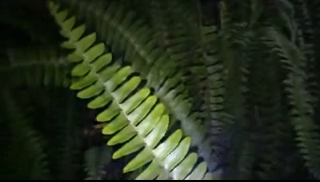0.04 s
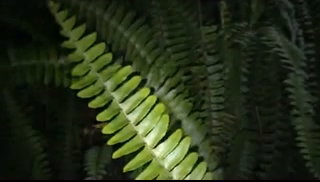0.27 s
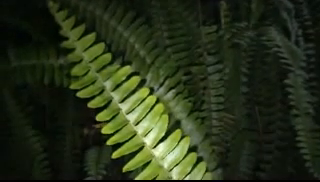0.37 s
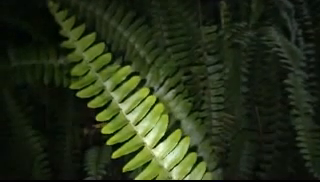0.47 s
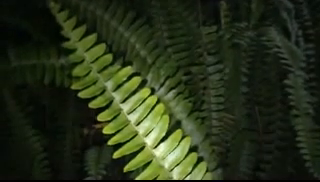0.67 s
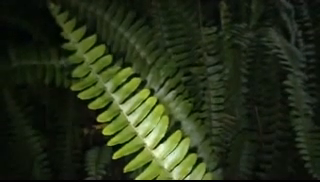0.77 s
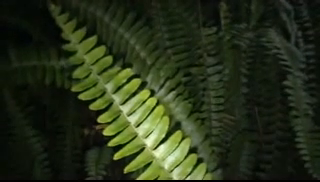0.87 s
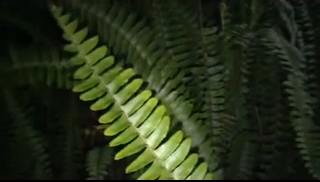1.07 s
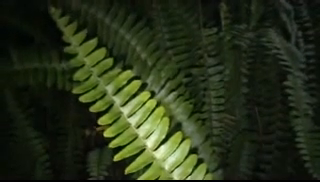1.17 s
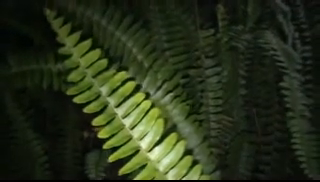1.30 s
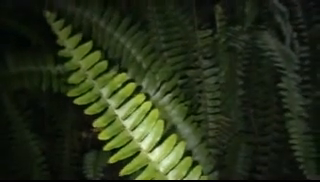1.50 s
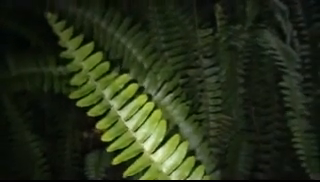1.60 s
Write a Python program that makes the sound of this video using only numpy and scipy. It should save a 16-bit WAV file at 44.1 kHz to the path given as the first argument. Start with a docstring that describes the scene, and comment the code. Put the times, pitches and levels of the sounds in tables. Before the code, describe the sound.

Crickets chirp outdoors at night: one near the microphone sings a short note and a longer one, and a quieter one follows with a note and a rapid trill. Distant insects trill and rasp faintly throughout.

```python
"""A chorus of distant crickets shimmers in the night among ferns, with trills, short rasps and a faint hum.
Close by, a cricket scrapes a short note and a longer one of three strokes: each stroke of its file drives
the wing at resonance. A second answers farther off with a note and a run of pulses. Faint peeps, hoots,
buzzes and a small knock come and go. Leaves and ground scatter the songs into a soft echo."""
import sys
import numpy as np
from scipy import signal
from scipy.fft import rfft, irfft
from scipy.io import wavfile

SR = 44100
rng = np.random.default_rng(int(sys.argv[2]) if len(sys.argv) > 2 else 0)


def master(y):
    """Save y as 16-bit WAV."""
    cut = np.clip(np.atleast_2d(y).T, -1, 1)
    pcm = np.round(cut * 32767)  # scale
    wavfile.write(sys.argv[1], SR, pcm.astype(np.int16))


N = 72765


def undb(db):
    """Decibels are logarithmic: every 20 dB is a factor of ten in amplitude."""
    return 10 ** (np.asarray(db) / 20)


def unit(x):
    """Normalisation brings a signal to rms 1."""
    return x / np.sqrt(np.mean(x ** 2) + 1e-20)


def colour(x, points):
    """Filtering multiplies the spectrum by a curve through (Hz, dB) points."""
    hz, db = np.array(points, float).T
    f = np.maximum(np.arange(N // 2 + 1) * SR / N, 1)
    return irfft(rfft(x) * undb(np.interp(np.log(f), np.log(hz), db)), N)


def noise(points):
    """White noise takes on the spectrum of its filter; the result has rms 1."""
    return unit(colour(rng.standard_normal(N), points))


def walk(rate):
    """Low-passed noise of rms 1 fluctuates smoothly, about `rate` times a second."""
    f = np.arange(N // 2 + 1) * SR / N
    return unit(irfft(rfft(rng.standard_normal(N)) / (1 + (f / rate) ** 2) ** 2, N))


def turn(hz):
    """Phase is the time integral of frequency."""
    return 2 * np.pi * np.cumsum(hz) / SR


def garden(x, wet_db, t60_s=.2, build_s=.0027, side_db=-12):
    """Scattering by leaves and ground adds a short exponential tail, almost alike in both ears."""
    t = np.arange(SR // 2) / SR
    tails = rng.standard_normal((2, len(t))) * undb(-60 * t / t60_s) * (1 - np.exp(-t / build_s))
    mid, side = (unit(signal.fftconvolve(x, h)[:N]) * x.std() * undb(wet_db) for h in tails)
    return x + mid + undb(side_db) * side * np.array([[1], [-1]])


def chorus(t, per_group=5, slowest_hz=37.9, sag_hz=60, trim_db=-1):
    """Incoherent summation: many crickets, each at its own pitch and pace, melt into a shimmer."""
    # Groups of distant crickets. Each row: pitch in Hz, spread to either side in Hz, level in dB before trim.
    groups = [(5087, 28, -56), (5003, 52, -57.5), (5364, 100, -56), (5519, 19, -54.5)]
    # Blended hiss of the farthest insects. Each row: frequency in Hz, relative level in dB.
    hiss = [(2500, -38), (3200, -34), (3750, -18), (4400, -32), (4750, -12.5), (5150, -3), (5480, -3),
            (5700, -27), (5950, -23.5), (6330, -17), (6520, -12.5), (6750, -19.5), (7150, -28.5),
            (7420, -25.5), (8000, -31.5), (9700, -35.5), (10700, -29.5), (11200, -42), (11900, -62)]
    out = np.zeros(N)
    for hz, spread, db in groups:
        group = np.zeros(N)
        for place in np.linspace(-1, 1, per_group):
            stroke = (slowest_hz * rng.uniform(1.0, 1.2) * t + rng.random() + .17 * walk(3.2)) % 1
            pitch = hz + spread * (place + .4 * walk(8)) - sag_hz * (stroke - .5)
            group += np.sin(np.pi * stroke) ** 4 * np.sin(turn(pitch))
        out += undb(db) * unit(group)
    return garden(out, wet_db=-7.5) * undb(trim_db) + undb(-48.5) * noise(hiss)


def fast_trillers(t, half_width_s=.003, rise_hz_per_s=30000, uneven_db=1):
    """Pulse modulation: a few crickets stand out of the chorus with rapid trains of rising chirps."""
    # Fast trills. Each row: pitch in Hz, pulses per second, level in dB.
    trills = [(5150, 47, -52.5), (5365, 54, -51), (5376, 43, -50.5)]
    out = np.zeros(N)
    for hz, rate, db in trills:
        from_peak_s = ((rate * t + rng.random() + .12 * walk(12)) % 1 - .5) / rate
        pulse = np.exp(-(from_peak_s / half_width_s) ** 2) * undb(uneven_db * walk(44))
        pitch = hz + rise_hz_per_s * from_peak_s + 45 * walk(29.88)
        out += undb(db) * unit(pulse * np.sin(turn(pitch)))
    return garden(out, wet_db=-11)


def high_triller(t, hz=6660, drift_hz_per_s=-22.5, sag_hz=24.8, period_s=.0672):
    """Periodic modulation: shallow gaps divide an insect's thin tone into even, slightly falling pulses."""
    gap_at_s, gap_half_width_s, gap_db = .795, .007, -9
    stroke = (t - gap_at_s) / period_s % 1
    gap = np.exp(-(np.minimum(stroke, 1 - stroke) * period_s / gap_half_width_s) ** 2)
    envelope = undb(gap_db * gap + 1.9 * walk(110))
    pitch = hz + drift_hz_per_s * t - sag_hz * (stroke - .5) + 5 * walk(34.3)
    return garden(undb(-54.5) * unit(envelope * np.sin(turn(pitch))), wet_db=-19.5)


def drones(flutter_db=2.5):
    """Random modulation widens the held tones of distant insects into narrow bands."""
    # Held tones. Each row: pitch in Hz, rms waver in Hz, level in dB.
    tones = [(5143, 8.2, -51), (7366, 31, -72)]
    return sum(undb(db) * unit(undb(flutter_db * walk(40)) * np.sin(turn(hz + waver * walk(36))))
               for hz, waver, db in tones)


def hum(flutter_db=4, waver_hz=8.6):
    """Inharmonic partials, each wavering in level and pitch, add up to a far-off hum."""
    # Partials of the hum. Each row: frequency in Hz, level in dB before the stereo mix.
    partials = [(118.4, -78.5), (189, -71.5), (296, -71.5), (507, -69.5), (818, -71), (969, -70.5)]
    return sum(undb(db) * unit(undb(flutter_db * walk(7.9)) * np.sin(turn(hz + waver_hz * walk(23.5))))
               for hz, db in partials)


def night_air(left_over_right_db=1.2):
    """Decorrelation: independent mid and side signals spread a faint rumble and the hum wide."""
    # Spectrum of the rumble. Each row: frequency in Hz, relative level in dB.
    rumble = [(15, -59), (25, -39), (112, -5.5), (155, -8.5), (189, -9.5), (250, -5.5), (294, -3),
              (413, -5.5), (505, -7), (738, -6.5), (958, -4.5), (1060, -6), (3000, -18.5), (3900, -15.5),
              (6600, -120)]
    # Stereo width. Each row: frequency in Hz, side minus mid level in dB.
    width = [(50, 4), (120, -11), (300, -2), (1000, -1.5), (2500, 2.5)]
    treble = [(4500, -49), (9000, -82)]
    mid, side = (undb(-60.5) * noise(rumble + treble) + hum() for _ in range(2))
    ears = np.array([[1], [-1]])
    return (mid + colour(side, width) * ears) * undb(ears * left_over_right_db / 2)


def bursts(t, rows, spectrum, grain_db=1):
    """Gaussian envelopes shape flickering, filtered noise into short grainy swells."""
    swell = sum(undb(db) * np.exp(-2 * ((t - at) / half_width) ** 2) for at, half_width, db in rows)
    grains = rng.standard_normal(N) * undb(grain_db * walk(250))
    return swell * unit(colour(grains, spectrum))


def bush_cricket(t):
    """Noise gathered in two bands, near 4 and 10 kHz, is heard as a bush cricket's rasp."""
    # Rasps. Each row: centre in seconds, half-width in seconds, level in dB.
    rasps = [(0.02, 0.062, -61), (0.147, 0.062, -63), (1.2, 0.07, -63), (1.315, 0.055, -61.5),
             (1.43, 0.056, -61), (1.563, 0.076, -63.5)]
    # Their spectrum. Each row: frequency in Hz, relative level in dB.
    spectrum = [(2000, -39), (3800, -28), (4130, -3), (4250, 9.5), (4500, -9), (7000, -24), (8500, -7),
                (9600, -1.5), (10500, -3.5), (11300, -27), (12000, -49), (13000, -60)]
    return bursts(t, rasps, spectrum)


def stridulation(t, strokes, octave_db):
    """Each stroke of the file drives the wing at resonance; the tone swells, then drops as the wing slows."""
    attack_s, release_s, octave_attack_s = .007, .008, .003
    drop_at, swell_width = .785, .2  # shares of a stroke
    slip_s, slip_db = .0025, -13  # the tone dips briefly where its pitch drops
    jitter_hz, flutter_db = 7 * walk(250), .5 * walk(380)
    octave_flutter_db, scatter_rad = 2.8 * walk(170), .32 * walk(360)
    out = np.zeros(N)
    for start, length, db, hz, sag, drop, crest, depth_db in strokes:
        progress = np.clip((t - start) / length, 0, 1)
        ramps = np.clip((t - start) / attack_s, 0, 1) * np.clip((start + length - t) / release_s, 0, 1)
        gate = np.sin(np.pi / 2 * ramps) ** 2
        since_slip = (t - start - drop_at * length) / slip_s
        phase = turn(hz - sag * progress - drop * (1 + np.tanh(since_slip - .5)) / 2 + jitter_hz)
        swell_db = depth_db * (np.exp(-((progress - crest) / swell_width) ** 4) - 1)
        tone = undb(db + swell_db + flutter_db + slip_db * np.exp(-since_slip ** 2)) * np.sin(phase)
        build = 1 - np.exp(-np.maximum(t - start, 0) / octave_attack_s)
        octave = undb(octave_db + octave_flutter_db + .08 * swell_db) * np.sin(2 * phase + scatter_rad)
        out += gate * (tone + build * octave)
    return out


def near_cricket(t, echo_s=.037, echo_db=-16):
    """Stridulation close by: the wings scrape as they engage, and one reflection repeats their tone."""
    # Wing strokes. Each row: start in seconds, length in seconds, level in dB, pitch in Hz, sag in Hz,
    # final drop in Hz, crest as a share of the length, swell in dB.
    strokes = [(0.167, 0.034, -28.5, 5445, 31, 8.2, 0.45, 2), (0.193, 0.045, -19, 5380, 57, 11, 0.32, 2),
               (0.33, 0.064, -24.5, 5435, 32, 130, 0.17, 0.5),
               (0.387, 0.062, -15.5, 5487, 14, 150, 0.52, 5.5),
               (0.461, .055, -15.5, 5482, 16, 130, 0.43, 4.5)]
    # Dry scrapes. Each row: centre in seconds, half-width in seconds, level in dB.
    scrapes = [(.401, .011, -50), (.458, .011, -46.5), (.43, .07, -56.5), (.36, .03, -63), (.495, .03, -60)]
    # Their spectrum. Each row: frequency in Hz, relative level in dB.
    spectrum = [(2500, -45), (4000, -18), (5500, -10), (6600, 3), (7700, -17), (8700, -3.5), (9500, -10),
                (10700, -6), (12000, -10), (13500, -17)]
    song = stridulation(t, strokes, octave_db=-47)
    echo = undb(echo_db) * np.roll(song, int(echo_s * SR))
    return garden(song + echo, wet_db=-16) + bursts(t, scrapes, spectrum)


def glides(t, rows, glide_per_s, waver):
    """Frequency modulation bends short tones; glide and waver are shares of the pitch."""
    out = np.zeros(N)
    for at, half_width, db, hz in rows:
        pitch = hz * (1 + glide_per_s * (t - at) + waver * walk(175))
        out += undb(db) * np.exp(-((t - at) / half_width) ** 2) * np.sin(turn(pitch))
    return out


def hoots(t):
    """Low tones under smooth envelopes are heard as faint, far-off hoots."""
    # Hoots. Each row: centre in seconds, half-width in seconds, level in dB, pitch in Hz.
    calls = [(0.176, 0.045, -58.5, 814), (1.005, 0.022, -59, 791), (1.338, 0.027, -58, 810.4)]
    return glides(t, calls, glide_per_s=-.3, waver=.012)


def peeps(t):
    """Other insects peep in brief, high tone pulses that are almost sinusoidal."""
    # Peeps. Each row: centre in seconds, half-width in seconds, level in dB, pitch in Hz.
    calls = [(0.188, 0.012, -47, 6760), (0.287, 0.012, -51, 6300), (0.63, 0.0097, -55, 6700),
             (0.682, 0.0097, -50, 6270), (1.082, .013, -53, 6780), (1.093, 0.013, -54, 5950),
             (1.493, 0.012, -51, 5970)]
    return glides(t, calls, glide_per_s=-.15, waver=.0033)


def buzzing_insect(t):
    """Narrow-band noise near 3.7 kHz gives a lower insect's buzz its rough pitch."""
    # Buzzes. Each row: centre in seconds, half-width in seconds, level in dB.
    buzzes = [(0.843, 0.043, -65), (.92, 0.043, -60.5), (1.098, 0.039, -58.5), (1.148, 0.028, -55),
              (1.32, 0.044, -67), (1.377, 0.045, -56), (1.639, 0.08, -53)]
    # Their spectrum. Each row: frequency in Hz, relative level in dB.
    spectrum = [(3200, -32), (3520, -8), (3660, 0), (3780, 0), (3900, -10), (4200, -28), (5200, -60),
                (9000, -90)]
    return bursts(t, buzzes, spectrum)


def far_cricket(t, octave_db=-61.5, rise_hz_per_s=1200):
    """Stridulation farther off is weaker and more reverberant: one note, then quick rising pulses."""
    # Held note. Each row: start in seconds, length in seconds, level in dB, pitch in Hz, sag in Hz,
    # final drop in Hz, crest as a share of the length, swell in dB.
    strokes = [(0.971, 0.061, -32.5, 5490, 13.5, 17, 0.3, 3.5)]
    # Run of pulses. Each row: centre in seconds, length in seconds, level in dB, pitch in Hz.
    pulses = [(1.135, .013, -32, 5510), (1.151, .02, -34.5, 5583), (1.175, 0.018, -35.5, 5555),
              (1.197, 0.012, -32, 5530), (1.209, .014, -34.5, 5540), (1.229, .018, -32, 5590),
              (1.244, 0.014, -36.5, 5555), (1.26, .012, -34, 5580), (1.275, .013, -37.5, 5640),
              (1.293, .021, -33, 5640), (1.314, 0.02, -36, 5570), (1.33, 0.018, -41, 5620)]
    song = stridulation(t, strokes, octave_db)
    for at, length, db, hz in pulses:
        phase = turn(hz + rise_hz_per_s * np.clip(t - at, -length, length))
        envelope = np.exp(-(2 * (t - at) / length) ** 4)
        song += envelope * (undb(db) * np.sin(phase) + undb(octave_db) * np.sin(2 * phase))
    return garden(song, wet_db=-14)


def knock(t):
    """A broadband transient with a weaker tail is heard as a small, far knock."""
    # Onset and tail. Each row: centre in seconds, half-width in seconds, level in dB.
    parts = [(1.54, .005, -51.5), (1.555, .025, -60)]
    # Their spectrum. Each row: frequency in Hz, relative level in dB.
    spectrum = [(150, -15), (450, 0), (600, 1), (1000, -3), (1700, -3), (2300, -14), (3200, -8),
                (5000, -25), (9000, -60)]
    return bursts(t, parts, spectrum)


def scene():
    """Superposition: two crickets sound in front of the other insects and the night air."""
    t = np.arange(N) / SR
    singers = near_cricket(t) + far_cricket(t)
    insects = buzzing_insect(t) + bush_cricket(t) + high_triller(t) + drones() + peeps(t)
    distance = knock(t) + hoots(t) + night_air()
    return singers + insects + distance + chorus(t) + fast_trillers(t)


def record(dry, cutoff_hz=13600):
    """An elliptic low-pass filter cuts the highest treble steeply."""
    return signal.sosfilt(signal.ellip(8, .2, 70, cutoff_hz, fs=SR, output="sos"), dry)


dry = scene()
out = record(dry)
master(out)
```